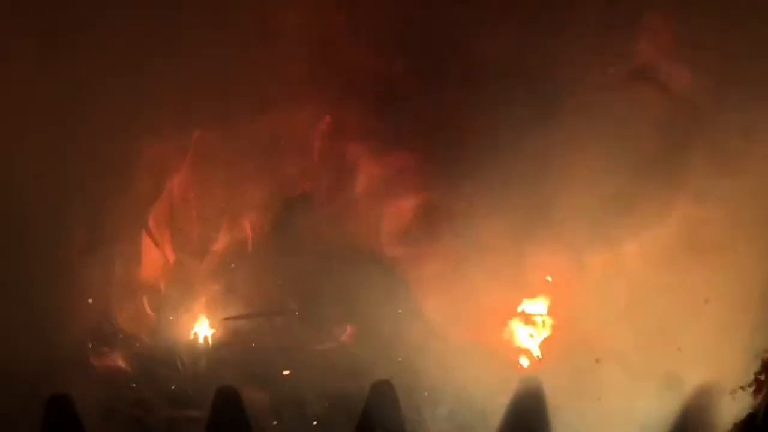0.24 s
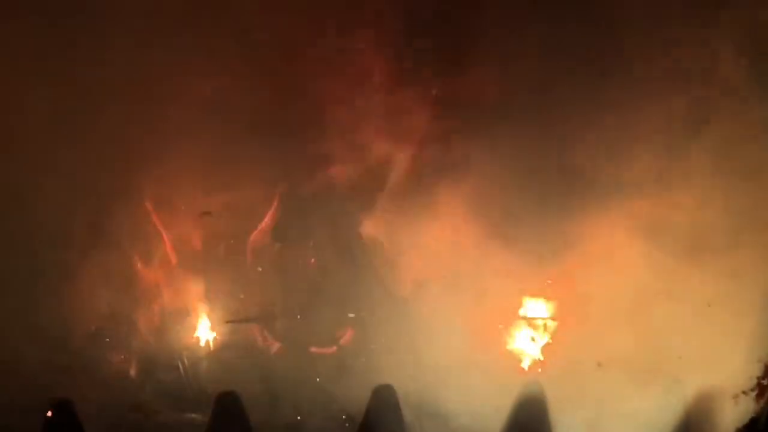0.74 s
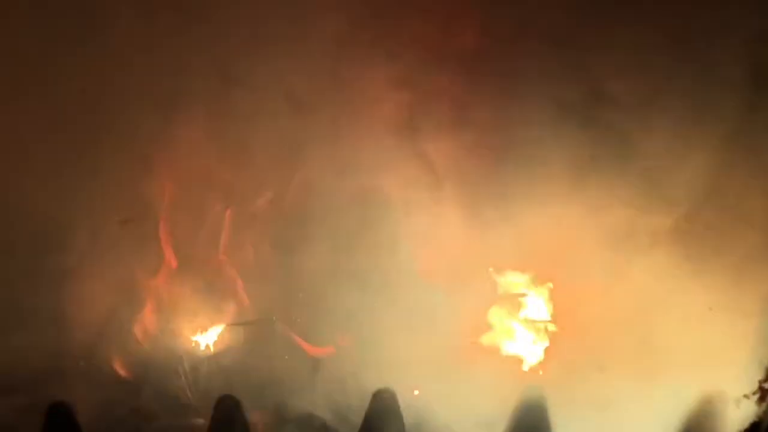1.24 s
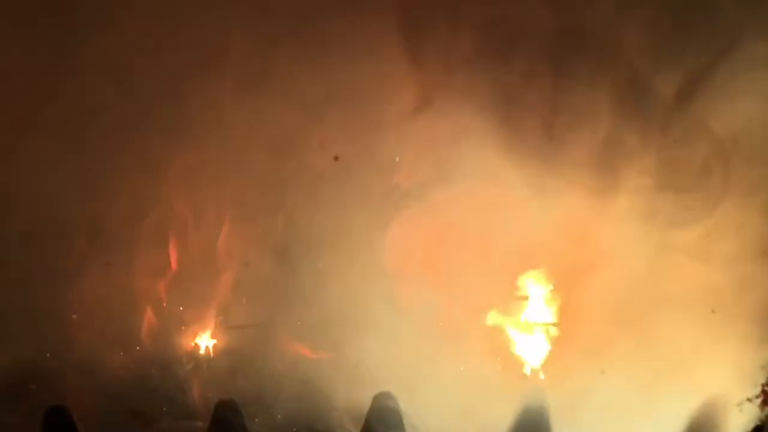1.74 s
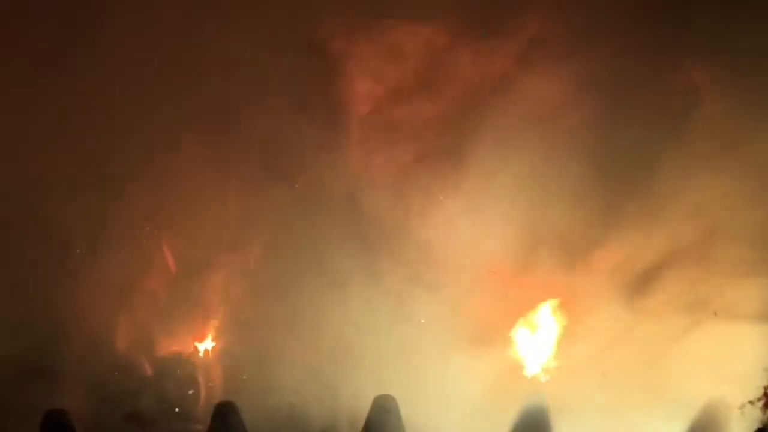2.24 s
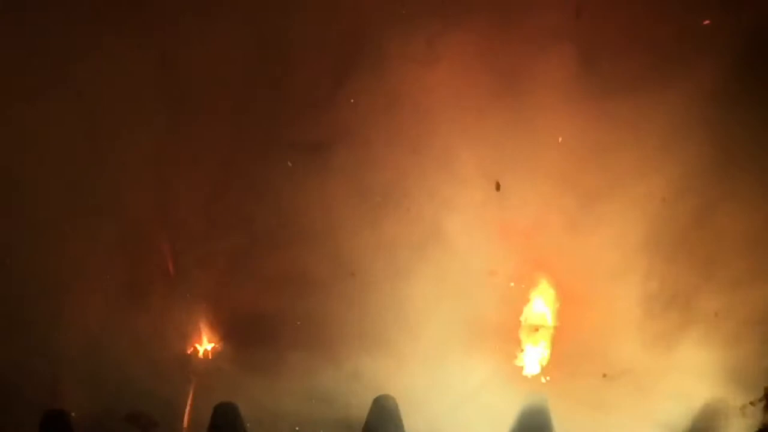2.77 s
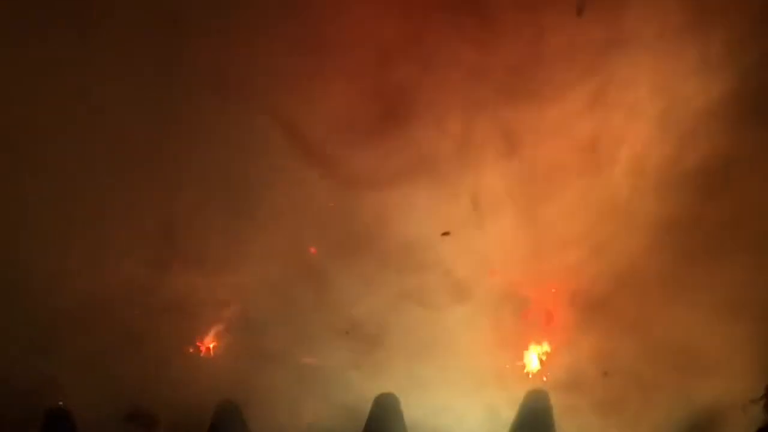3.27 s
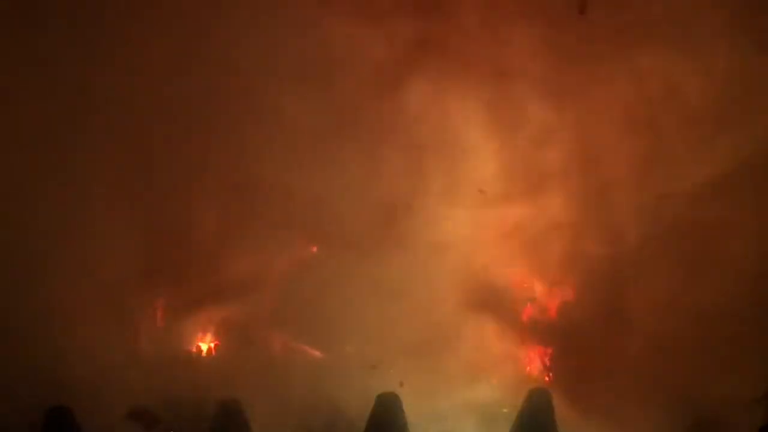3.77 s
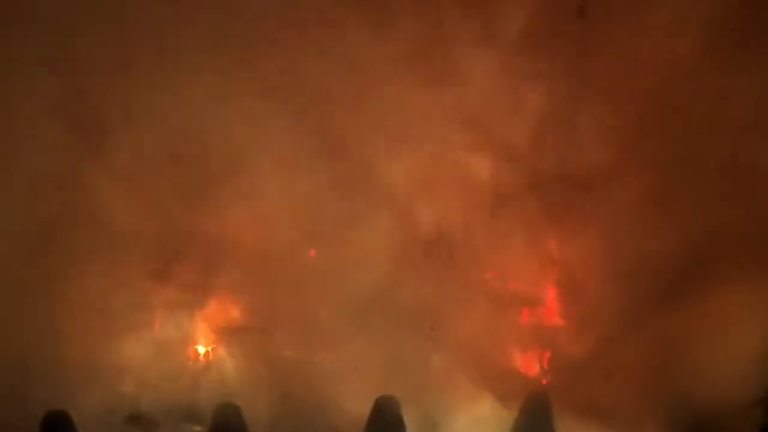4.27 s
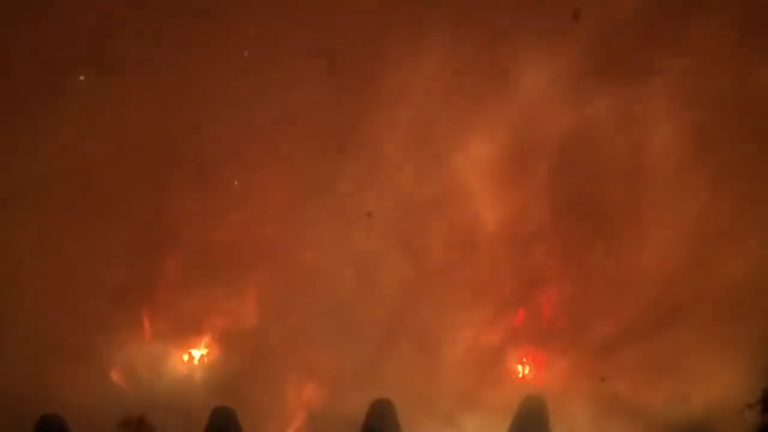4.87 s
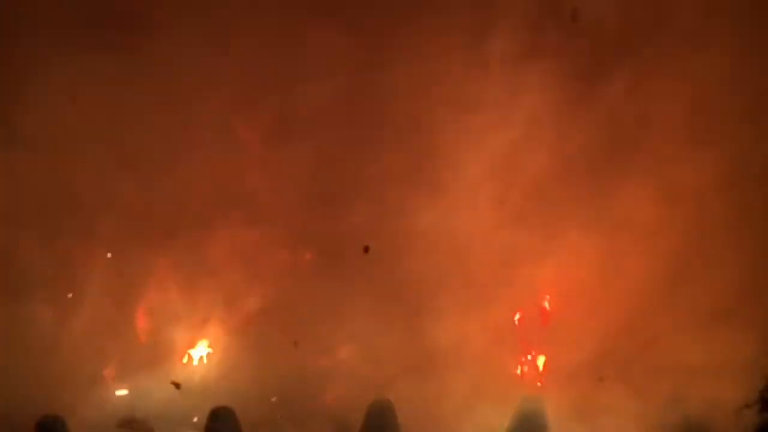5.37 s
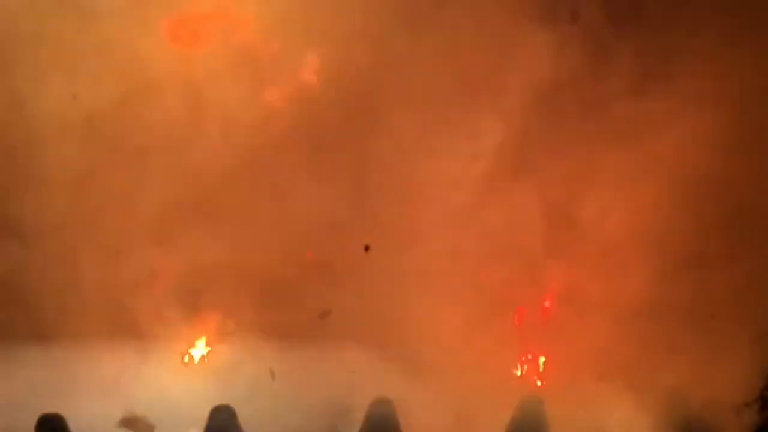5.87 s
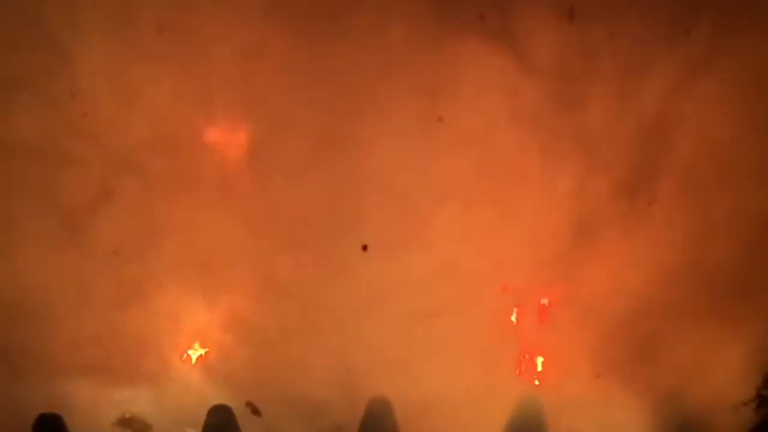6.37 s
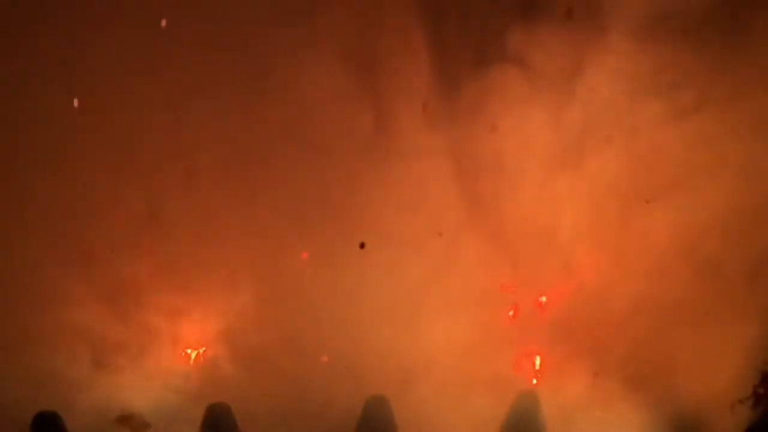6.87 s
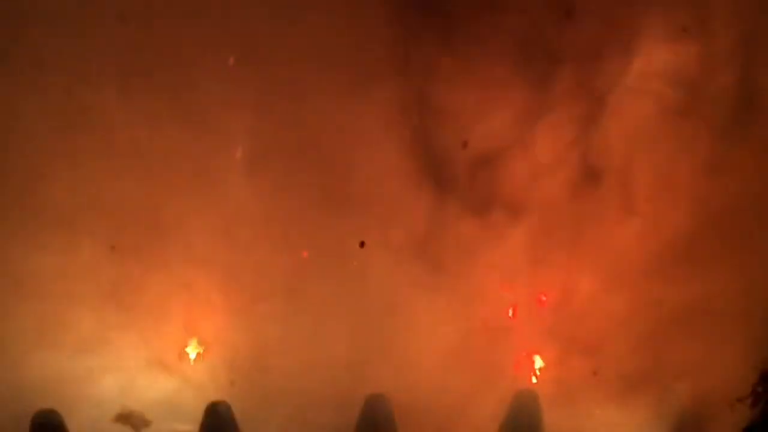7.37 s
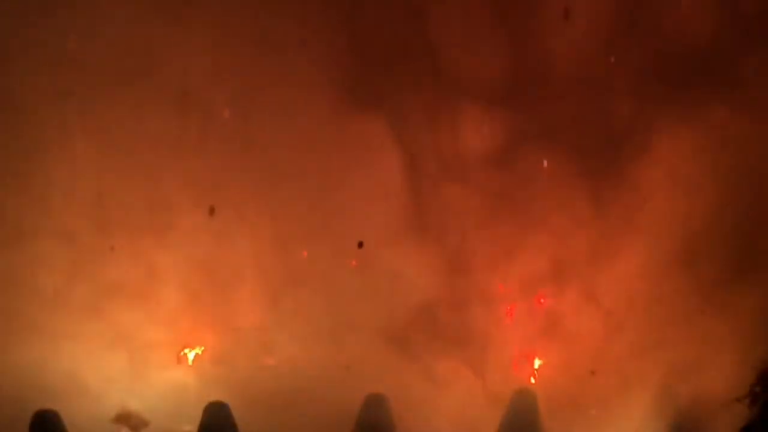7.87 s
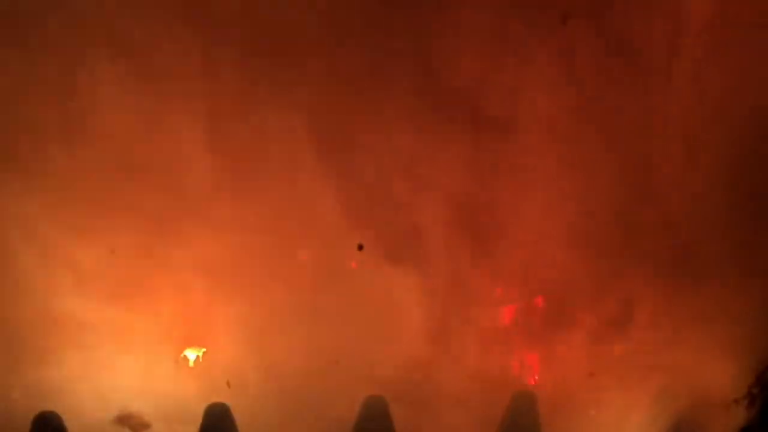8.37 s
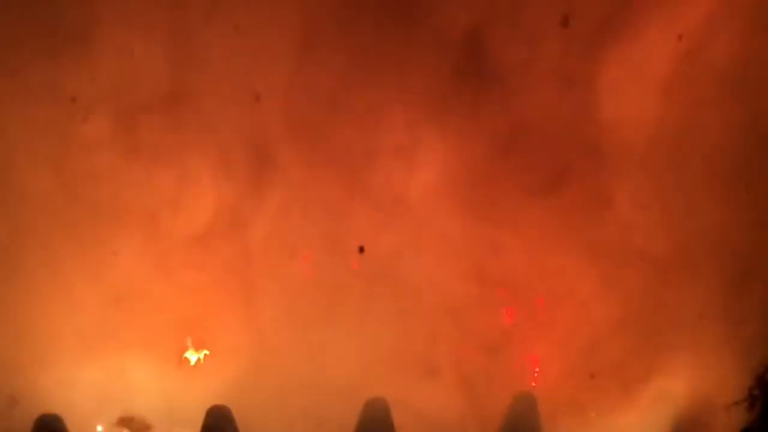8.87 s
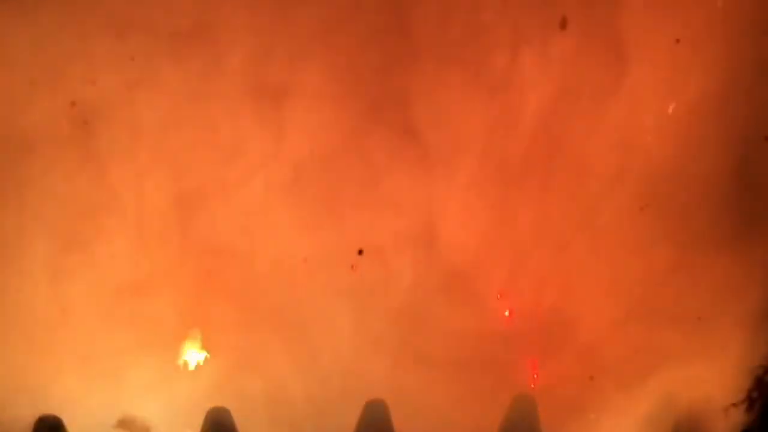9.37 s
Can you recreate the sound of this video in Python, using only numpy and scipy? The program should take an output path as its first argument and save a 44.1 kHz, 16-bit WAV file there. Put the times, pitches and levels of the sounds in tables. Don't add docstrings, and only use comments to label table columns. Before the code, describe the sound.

Muffled, boomy firecracker blasts in a brick hearth: a few separate bangs, a dense rattling volley, then soft burning hiss.

```python
import sys
import numpy as np
from scipy import signal
from scipy.fft import rfft, irfft, next_fast_len
from scipy.io import wavfile
from scipy.ndimage import uniform_filter1d, minimum_filter1d

SR = 44100
rng = np.random.default_rng(int(sys.argv[2]) if len(sys.argv) > 2 else 0)


def store_pcm(level_fs):
    pcm = np.round(np.clip(level_fs, -1, 1) * 32767).astype(np.int16)
    wavfile.write(sys.argv[1], SR, np.atleast_2d(pcm).T)


def ratio_of_db(decibels):
    return 10 ** (np.asarray(decibels, float) / 20)


N = 424241
SLOW = 8
FS, M = SR / SLOW, N // SLOW + 1

BANDS_HZ = np.array(np.array([40, 100, 220, 490, 900, 1400, 2000]))
# (time [s], level [dB], sizzle above 700 Hz [dB])
FIRE_LEVELS = [(0, -41, 0), (.4, -43, 1), (.7, -40.5, -2), (.9, -39, -1), (1.3, -37.5, -2.5), (2, -39, 0.4),
               (2.8, -43.5, 0), (3.4, -40, 1), (3.799, -39, 0.1), (6.3, -46.5, 0.2), (6.7, -38.5, -1.5),
               (7, -46, -3.5), (7.3, -47, -3.5), (7.6, -49, -2), (8, -47, 2.5), (8.5, -47.5, 1.5),
               (9, -46.5, -1.5), (9.62, -47, 1.5)]
# (time [s], level [dB], boom [dB],
# dullness [dB])
CRACKER_BANGS = [(1.354, 1, 4.5, 0), (1.38, -7.5, 2.5, 0.2), (1.412, -12, 9.5, 0.2), (1.993, -4, 7.5, -5.5),
                 (2.017, -9, 2.5, -2), (2.316, -34, 5.5, -9), (2.683, -23.5, 0.5, 1),
                 (2.776, -27, 0.2, -3.5), (2.936, -2, 1.5, 2.5), (2.988, -19, 7, 5), (3.823, -1, 1, -4.5),
                 (3.847, -6.5, 1.5, -0.4), (3.9, -1.5, -2, 4.5), (3.937, -9, 3, 3), (4.071, 0.5, -2.5, -3),
                 (4.227, -35.5, 4, 5.5), (5.865, -12.5, 10.5, -1.5), (5.898, -5.5, 0.5, -4),
                 (5.917, 0.5, -1.5, -5.5), (5.949, -2, 1, -1.5), (5.987, -17.5, 5, -3),
                 (6.173, -18, 1.5, -1.5), (6.267, -3, 3.5, 0), (6.288, 3.5, -4.5, -3.5),
                 (6.34, -3, -1.5, 3), (7.774, -18.5, 0.5, -4), (8.523, -44.5, 8, -10), (9.52, -40.5, 7, -3),
                 (4.31, 3.5, -3, -2.5), (4.35, -4.5, 0.5, -1), (4.38, -1, -1.5, -2.5),
                  (4.406, -2, -1.5, 4), (4.467, 2, -2, 1.5), (4.529, 1.5, -3.5, 1), (4.567, 2, -4, -3),
                  (4.604, 5.5, -2.5, 0.6), (4.659, 2.5, -4, 0.5), (4.722, -0.5, 4, -3.5),
                  (4.769, -0.5, 4.5, -3.5), (4.833, -8, 4, -3), (4.856, 3, -2, -1.5), (4.934, 2, -3, -3),
                  (5.046, -5, 3, -4), (5.053, 0, -4, -3.5), (5.104, 2, -1.5, -0.5), (5.228, -3, -1, 0),
                  (5.27, -4, 2.5, -3.5), (5.297, -10, 1, 0.5), (5.348, -2, -3, -1), (5.451, -3, 2.5, -6.5),
                  (5.474, -4, -0.5, -2), (5.567, -4.5, 6.5, 5), (5.605, -3, -5, 4.5), (5.638, -4, -9, 3),
                  (5.672, -14, 4, -4), (5.712, -1, -0.1, -1), (5.754, 0, -7, 1.5)]
CRACKERS = CRACKER_BANGS


def on_log(table, hz):
    table_hz, value = np.transpose(table)
    return np.interp(np.log(np.maximum(hz, 1)), np.log(table_hz), value)


def curve(time_s, level_db):
    return ratio_of_db(np.interp(np.arange(M) / FS, time_s, level_db))


def unit(x):
    return x / np.sqrt(np.mean(x ** 2))


def walk(rate_hz):
    hold = max(int(FS / rate_hz), 1)
    held = rng.standard_normal(M // 20)[np.arange(M) // hold]
    return unit(uniform_filter1d(held, hold))


def patchy(spread_db, rate_hz):
    return ratio_of_db(spread_db * np.array([walk(rate_hz) for _ in BANDS_HZ]))


def join(bands):
    size = next_fast_len(M)
    hz = np.maximum(np.arange(size // 2 + 1) * FS / size, 1)
    place = np.interp(np.log(hz), np.log(BANDS_HZ), np.arange(len(BANDS_HZ)))
    spectrum = 0
    for k, band in enumerate(bands):
        share = np.clip(1 - np.abs(place - k), 0, 1)
        spectrum = spectrum + share * rfft(band, size)
    return irfft(spectrum, size)[:M]


def hearth(x, broad_db):
    # (frequency [Hz], width [Hz], height [dB])
    resonances = [(122.7, 14, 6), (214.2, 25, 6), (289.5, 34, 6.5), (407.3, 24, 4), (487.5, 23, 6.5),
                  (572.6, 20, 6), (728, 19, 5.5), (871, 40, 5.5), (1118.4, 40, 4.5), (1620, 15, 3),
                  (1810, 37, 2), (1963, 140, 3)]
    hz = np.linspace(0, FS / 2, 2049)
    db = on_log(broad_db, hz)
    for centre_hz, width_hz, height_db in resonances:
        db = db + height_db / (1 + (2 * (hz - centre_hz) / width_hz) ** 2)
    cepstrum = irfft(np.log(ratio_of_db(db)))
    cepstrum[1:2048] *= 2
    cepstrum[2049:] = 0
    response = irfft(np.exp(rfft(cepstrum)))
    return signal.fftconvolve(x, response / np.sqrt(np.sum(response ** 2)))[:M]


def fire():
    # (frequency [Hz], level [dB per Hz])
    fire_spectrum = [(16, -29), (26, -9), (43, -16), (162, -11), (209, -3), (342, -17), (511, -4),
                     (613, -12.5), (722, -12.5), (1580, -25.5), (2010, -25), (2200, -29), (2860, -60),
                     (4840, -120)]
    spits_per_s = 40
    spits = (rng.random(M) < spits_per_s / FS) * ratio_of_db(8.5 + 2.0 * rng.exponential(size=M))
    spits = signal.lfilter([1], [1, -.9], spits) * ratio_of_db(-11.0)
    hiss = rng.standard_normal(M) * np.sqrt(1 + spits)
    hiss = hiss * patchy(0.94, 3.2) * patchy(1.7, 13)
    time_s, level_db, sizzle_db = np.transpose(FIRE_LEVELS)
    hiss[4:] *= curve(time_s, sizzle_db)
    return curve(time_s, level_db) * unit(hearth(join(hiss), fire_spectrum))


def room_swing():
    # (frequency [Hz], level [dB], t60 [s])
    air_modes = [(6.7, -3.5, 1.6), (12.6, 2, 1.3)]
    bang_db, db_per_bang_db, draught_db = -24, 0.4, -2.5
    kicks = np.zeros(M)
    for time_s, level_db, _, _ in CRACKERS:
        kicks[int(time_s * FS)] = ratio_of_db(bang_db + db_per_bang_db * level_db)
    draught = rng.standard_normal(M)
    time_s, level_db, _ = np.transpose(FIRE_LEVELS)
    draught_gain = ratio_of_db(draught_db) * curve(time_s, level_db)
    swing = np.zeros(M)
    for hz, mode_db, t60_s in air_modes:
        pole = np.exp((2j * np.pi * hz - np.log(1000) / t60_s) / FS)
        after_bangs = signal.lfilter([1], [1, -pole], kicks).imag
        in_draught = unit(signal.lfilter([1], [1, -pole], draught).imag)
        swing += ratio_of_db(mode_db) * (after_bangs + draught_gain * in_draught)
    return signal.sosfilt(signal.butter(2, 4.5, "high", fs=FS, output="sos"), swing)


def bangs():
    # (frequency [Hz], level [dB per Hz])
    bang_spectrum = [(15, -38), (32, -1.5), (76, -8), (204, -1), (371, -10.5), (473, -2.5), (615, -7.5),
                     (1210, -12.5), (1480, -18.5), (1930, -20.5), (2200, -26.5), (2860, -63.5),
                     (4840, -120)]
    # (frequency [Hz], t60 [s])
    room_t60 = [(40, 1.28), (200, 1.04), (600, 0.72), (2000, 0.8)]
    # (frequency [Hz], level [dB])
    room_db = [(40, -11.5), (200, -9.5), (600, -10.5), (2000, -12.5)]
    shock_db, crack_db, crack_s = 12.0, 6.0, 0.0062
    sag_t60_s, stop_t60_s, treble_power = 0.42, 0.29, 0.19
    rise_s, late_s = 0.0015, 0.0067
    volley_s, volley_s_per_db = 0.031, -0.01
    age_s, hz = np.arange(int(1.2 * FS)) / FS, BANDS_HZ[:, None]
    fall = 2 * np.log(1000)
    rise = 1 - np.exp(-age_s / (rise_s + late_s * 100 / hz))
    crack = ratio_of_db(crack_db) ** 2 * np.exp(-age_s / crack_s) * np.minimum(hz / 1000, 1.5)
    room = rise * np.exp(-fall * age_s / on_log(room_t60, hz)) * ratio_of_db(on_log(room_db, hz)) ** 2
    front = np.array([.3, -.6, 0.89, -0.66, .8, -.6])
    gaps = 2 + 6 * rng.random((len(CRACKERS), 6))
    steps = np.cumsum(gaps, axis=1).astype(int)

    echo_power, tail_power, shock = np.zeros((3, len(hz), M + len(age_s)))
    for (time_s, db, boom_db, dull_db), step in zip(CRACKERS, steps):
        i = int(time_s * FS)
        tilt = [(70, 0.24 * boom_db), (220, boom_db), (490, dull_db), (900, 2), (1600, -dull_db)]
        gain = ratio_of_db(db + on_log(tilt, hz))
        overtime_s = np.maximum(age_s - (volley_s + volley_s_per_db * db), 0)
        sag = age_s / sag_t60_s + overtime_s / stop_t60_s
        fade = np.exp(-fall * sag * (hz / 500) ** treble_power)
        shock[:, i + step - step[0]] += gain * ratio_of_db(shock_db) * front
        echo_power[:, i:i + len(age_s)] += gain ** 2 * rise * (fade + crack)
        tail_power[:, i:i + len(age_s)] += gain ** 2 * room

    grain = unit(rng.standard_normal(M) * ratio_of_db(3.0 * walk(150)))
    echoes = grain * patchy(1.1, 40) * np.sqrt(echo_power[:, :M])
    wash = rng.standard_normal(M) * patchy(2.6, 20) * np.sqrt(tail_power[:, :M])
    return ratio_of_db(-8.5) * hearth(join(shock[:, :M] + echoes + wash), bang_spectrum)


def scene():
    x = fire() + room_swing() + bangs()
    x = 1.042 * np.tanh(x / 1.096)
    x = x * np.minimum(np.arange(M)[::-1] / (.001 * FS), 1)
    steep_edge = signal.ellip(8, .1, 45, 2220, fs=FS, output="sos")
    x = signal.sosfiltfilt(steep_edge, x)
    size = next_fast_len(M + 500)
    return SLOW * irfft(rfft(x, size), SLOW * size)[None, :N]


def low_pass(x):
    return signal.sosfilt(signal.butter(12, 16000, fs=SR, output="sos"), x)


def record(dry):
    # (time [s], tick level [dB], shaved width [ms])
    overloads = [(3.824, -34.5, 0.07), (4.0741, -41, 0.045), (4.5112, -35, 0.14), (4.535, -42.5, 0.049),
                 (4.6143, -28, 0.145), (4.7287, -32.5, 0.15), (4.8613, -39, 0.045), (4.8755, -27.5, 0.16),
                 (4.939, -30, 0.17), (5.0573, -36.5, 0.04), (5.923, -26, 0.14), (5.9572, -29.5, 0.16),
                 (6.2942, -42, 0.06)]
    peak = -minimum_filter1d(-np.abs(dry), size=400)
    limit = np.maximum(uniform_filter1d(peak, size=300) / .99, 1)
    shaved = dry / limit + ratio_of_db(-96.5) * rng.standard_normal(N)
    near = np.arange(-12, 13)
    for time_s, tick_db, width_ms in overloads:
        cap = np.maximum(1 - (2000 * near / SR / width_ms) ** 2, 0)
        shaved[:, int(time_s * SR) + near] -= ratio_of_db(tick_db + 7) * cap
    return low_pass(shaved)


dry = scene()
out = record(dry)
store_pcm(out)
```